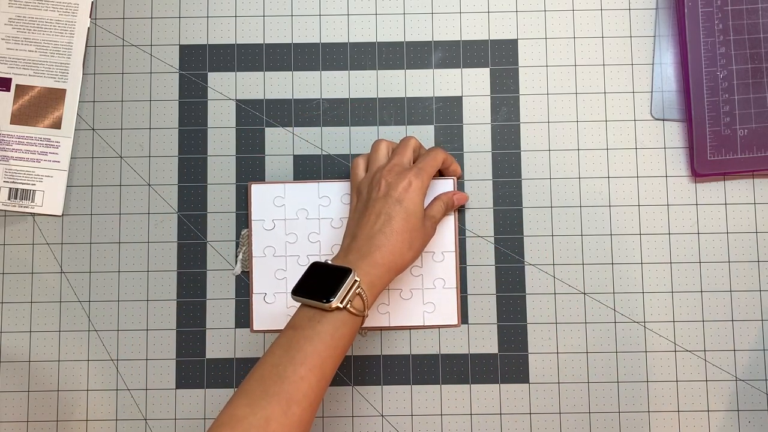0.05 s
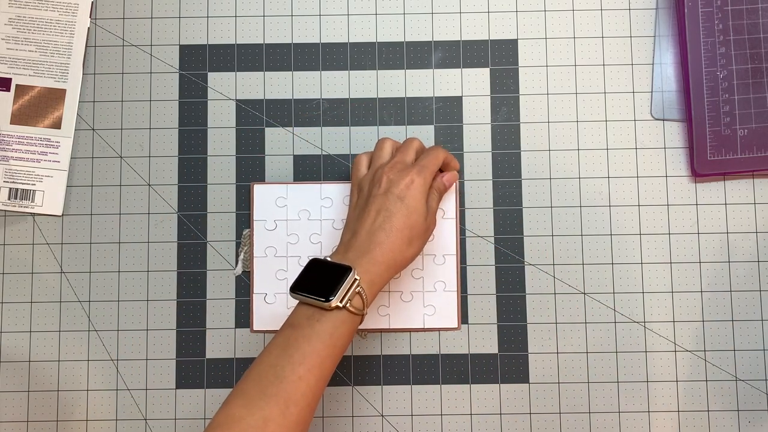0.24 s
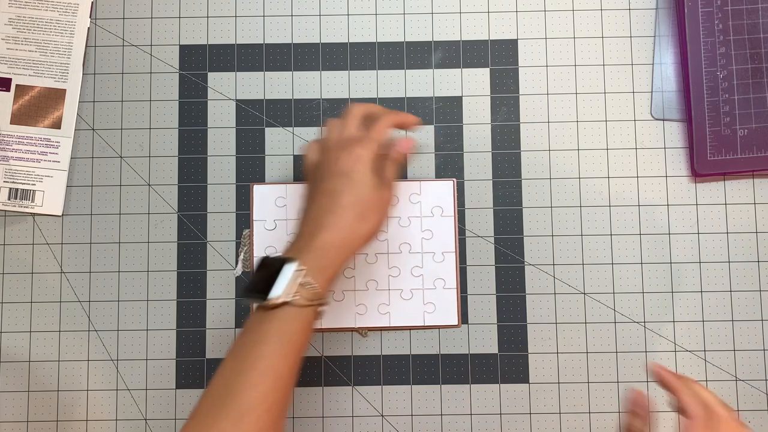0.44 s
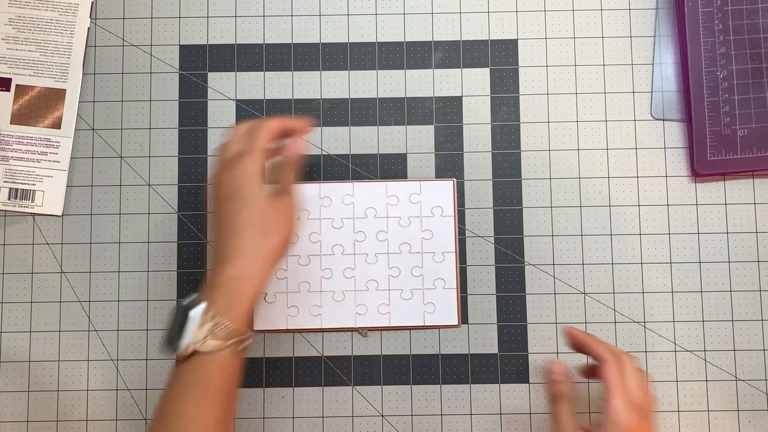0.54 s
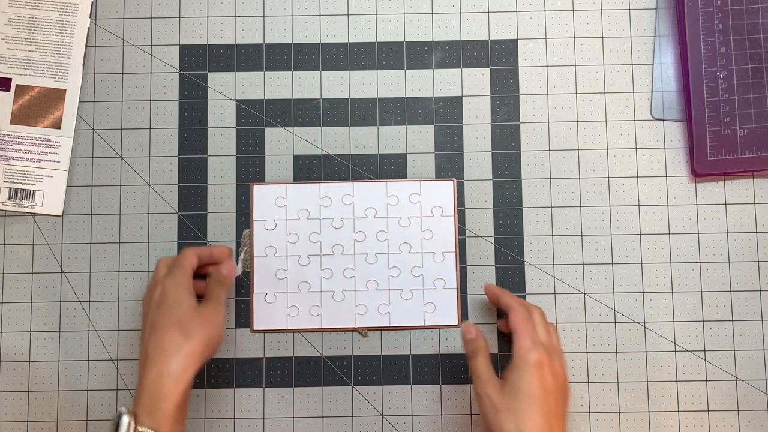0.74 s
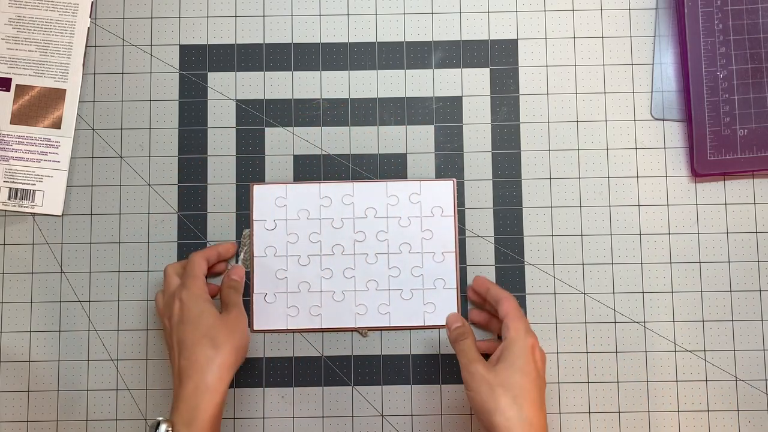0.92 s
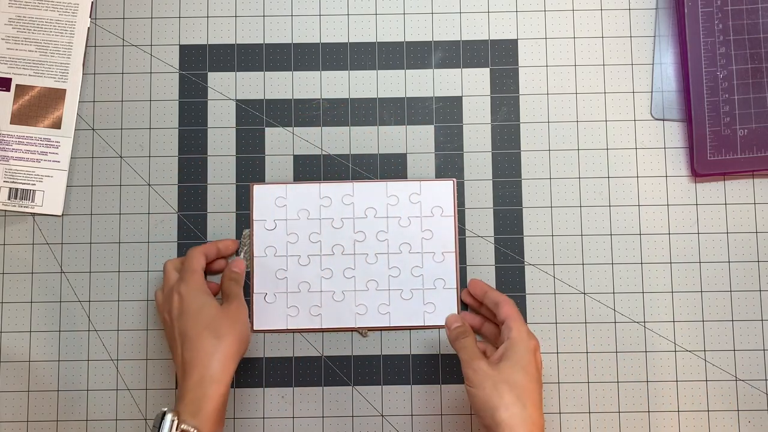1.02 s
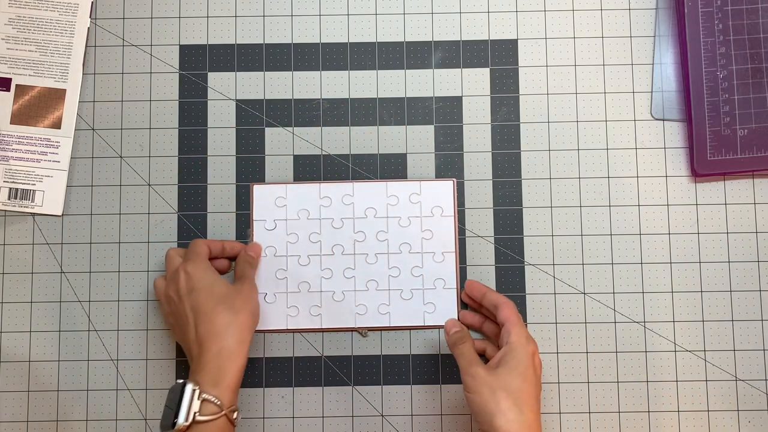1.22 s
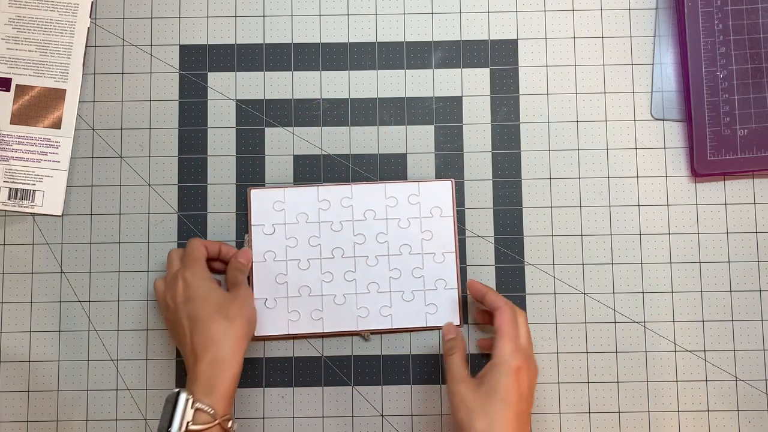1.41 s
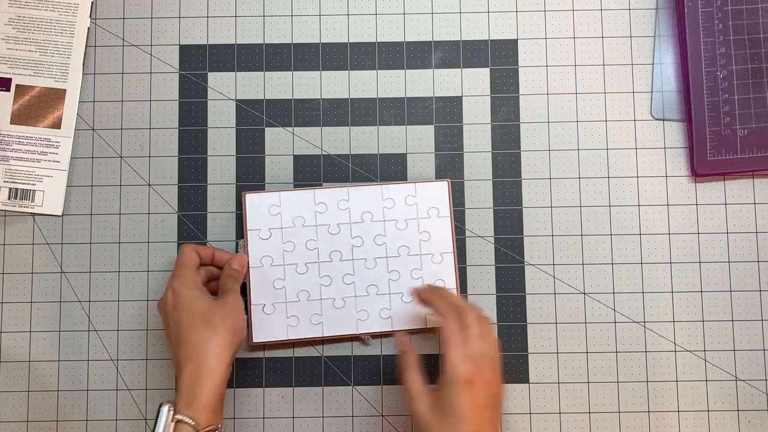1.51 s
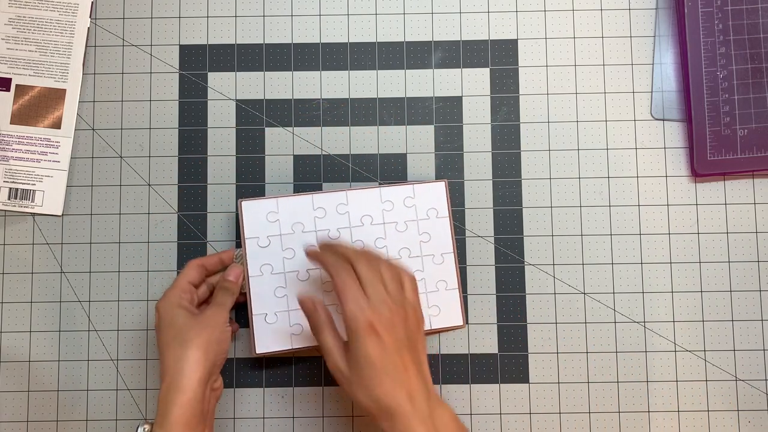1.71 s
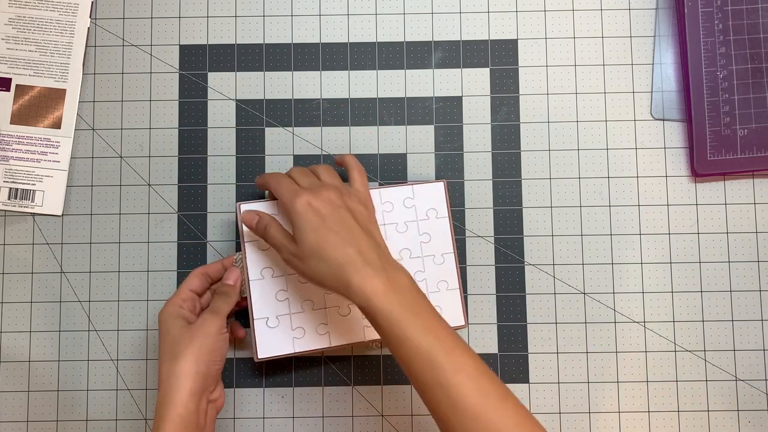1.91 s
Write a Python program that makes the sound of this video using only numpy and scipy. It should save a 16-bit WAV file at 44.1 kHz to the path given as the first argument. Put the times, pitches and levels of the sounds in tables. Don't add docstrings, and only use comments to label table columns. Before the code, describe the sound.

A stiff card snaps loudly onto a shallow box on a cutting mat, bounces at once with a low table thump, then quiet taps, ticks and scuffs follow, close microphone in a small room.

```python
import sys
import numpy as np
from scipy import signal
from scipy.io import wavfile
from scipy.ndimage import uniform_filter1d

SR = 44100
rng = np.random.default_rng(int(sys.argv[2]) if len(sys.argv) > 2 else 0)


def wrap_up_sound(samples):
    columns = np.atleast_2d(samples).T
    tamed = np.clip(columns, -1, 1)
    steps = np.round(tamed * 32767).astype(np.int16)
    wavfile.write(sys.argv[1], SR, steps)


def field_ratio(decibels):
    return 10 ** (np.asarray(decibels, dtype=float) / 20)


N = 85995

# frequency in Hz, level in dB.
SCRATCH_SPECTRUM = [(2000, -0.5), (2800, 11), (3600, 5), (5500, 0.5), (8000, -5.5), (12000, -8),
                    (17000, -32.5)]


def evened(x):
    return x / np.sqrt(np.mean(x ** 2) + 1e-20)


def read(points, hz):
    f, value = np.transpose(points)
    return np.interp(np.log(hz + 1), np.log(f + 1), value)


def along(curve):
    return field_ratio(np.interp(np.arange(N) / SR, *np.transpose(curve)))


def add(mix, s, sound):
    part = mix[round(s * SR):][:len(sound)]
    part += sound[:len(part)]


def ring(modes, weight_db):
    t = np.arange(12000)[:, None] / SR
    hz, db, t60 = np.transpose(modes)
    envelope = field_ratio(db + weight_db - 60 * t / t60)
    x = (envelope * np.sin(2 * np.pi * hz * t)).sum(1)
    return x / np.linalg.norm(x)


def causal(points):
    spectrum_db = read([(0.76, -37)] + points, np.fft.rfftfreq(1024, 1 / SR))
    half = np.log(field_ratio(spectrum_db))
    log_gain = np.r_[half, half[-2:0:-1]]
    phase = -signal.hilbert(log_gain).imag
    x = np.fft.ifft(np.exp(log_gain + 1j * phase)).real[:512]
    return x / np.linalg.norm(x)


def clicks(shape, share, spread_db):
    size = field_ratio(spread_db * np.minimum(rng.exponential(1, shape), 4))
    sign = rng.choice([-1., 1.], shape)
    return size * sign * (rng.random(shape) < share)


def floor():
    # frequency in Hz, level in dB per Hz.
    floor_spectrum = [(12, -21), (20, 7.5), (61, -5.5), (607, -24), (698, -27.5), (1330, -29.5),
                      (1760, -31), (3160, -38.5), (16000, -44.5)]
    frames, hz = N // 512 + 5, np.fft.rfftfreq(2048, 1 / SR)
    a, b, patches = rng.standard_normal((frames, 1025, 3)).T
    patches = uniform_filter1d(patches, size=24, axis=0)
    patches = evened(uniform_filter1d(patches, size=6, axis=1))
    z = (a + 1j * b) * field_ratio(read(floor_spectrum, hz)[:, None] + 1.0 * patches)
    noise = signal.istft(z, nperseg=2048, noverlap=1536)[1][:N]
    return field_ratio(-45.5) * evened(noise)


def room(x):
    # frequency in Hz, t60 in seconds.
    room_decay = [(100, 0.69), (500, 0.18), (2000, 0.11), (8000, 0.15), (16000, 0.1)]
    echoes, starts = np.zeros(SR // 2), np.arange(120, SR // 2 - 20, 20)
    echoes[starts + rng.integers(0, 20, len(starts))] = rng.choice([-1., 1.], len(starts))
    hz, t, z = signal.stft(echoes, SR, nperseg=256)
    decay = field_ratio(-60 * t / read(room_decay, hz)[:, None])
    tail = signal.istft(z * decay, SR, nperseg=256)[1]
    return signal.fftconvolve(x, tail / np.linalg.norm(tail))[:N]


def table():
    # start in seconds, level in dB, hardness in Hz.
    blows = [(0.241, -21.5, 300), (0.269, -23.5, 202), (.292, -23.5, 149), (0.318, -30.5, 200),
             (0.353, -31, 106), (0.675, -36.5, 300), (0.711, -38, 100), (0.752, -40.5, 405),
             (0.787, -38.5, 151), (0.863, -44, 195), (.923, -40.5, 350), (0.9457, -41, 300),
             (1.325, -42.5, 152), (1.447, -39.5, 199), (1.801, -39, 213), (.385, -34.5, 70)]
    # mode frequency in Hz, level in dB, t60 in seconds.
    table_modes = [(45.2, -10, 0.72), (54, 0, 0.087), (64.3, -2.5, 0.12), (86, -4, 0.091),
                   (137.4, -2, 0.12), (186, -9.5, 0.46), (225.5, 0, 0.036), (300, -1, 0.092)]
    out, hz = np.zeros(N), np.transpose(table_modes)[0]
    for s, db, hard_hz in blows:
        softness_db = -10 * np.log10(1 + (hz / hard_hz) ** 4)
        add(out, s, field_ratio(db + 27) * ring(table_modes, softness_db))
    return out


def glide():
    # time in seconds, speed in dB.
    glide_speed = [(0, -110), (.3, -68), (.45, -71), (.52, -73.5), (.58, -67.5), (.7, -77.5), (1.1, -74.5),
                   (1.45, -72.5), (1.51, -67.5), (1.6, -68), (1.67, -65.5), (1.73, -62), (1.8, -58),
                   (1.85, -61.5), (1.88, -74), (1.95, -70)]
    grit_hz, width_hz, sag_hz = 3500, 740, 450
    load = along(glide_speed)
    pitch_hz = grit_hz - sag_hz * load / load.max()
    turn = np.exp(2j * np.pi * np.cumsum(pitch_hz) / SR)
    band = signal.butter(2, width_hz / 2, fs=SR, output="sos")
    flicker = field_ratio(1.5 * evened(uniform_filter1d(rng.standard_normal(N), size=600)))
    grit = clicks(N, 0.26, 1.5) * flicker
    resonance = evened((turn * signal.sosfilt(band, grit / turn)).real)
    hiss = field_ratio(-1.5) * evened(np.convolve(grit, causal(SCRATCH_SPECTRUM))[:N])
    return (resonance + hiss) * load


def card(colour_hz, crack_db, width_oct, crack):
    # mode frequency in Hz, level in dB, t60 in seconds.
    card_modes = [(362, 9, 0.039), (446, -6, 0.049), (592, 5.5, 0.033), (822, 2.5, 0.021),
                  (1270, -1.5, 0.15), (1467, -3, 0.057), (1646, 1.5, 0.031), (1883, 5, 0.017),
                  (2124, 4, 0.023), (2264, 0, 0.031), (2500, 6, 0.021), (2770, 6.5, 0.018),
                  (3150, 5.5, 0.0093), (3500, -1, 0.0082)]
    hand_t60, bend = 0.055, 0.02
    hz, db, t60 = np.transpose(card_modes)
    bent_hz = hz * (1 + bend * rng.standard_normal(len(hz)))
    modes = np.transpose([bent_hz, db, np.minimum(t60, hand_t60)])
    octaves = np.log2(hz / colour_hz) / width_oct
    fibres = np.pad(causal(crack), (0, 11488)) * field_ratio(crack_db + 12.0)
    return 4.0 * ring(modes, -6.0 * octaves ** 2) + fibres


def contacts(rows, width_oct, crack, first, soft=False):
    out, t = np.zeros(N), np.arange(6000) / SR
    flurries = clicks((len(rows), 6000), .3, 2.2)
    for (s, db, hz, crack_db, length), flurry in zip(rows, flurries):
        push = (flurry + first * (t == 0)) * np.exp(-t / length)
        if soft:
            push = push * t
        push = push / np.linalg.norm(push)
        answer = card(hz, crack_db, width_oct, crack)
        add(out, s, field_ratio(db) * signal.fftconvolve(push, answer))
    return out


def rub():
    # time in seconds, pressure in dB.
    rub_pressure = [(0, -50), (.07, -64), (.13, -72.5), (.2, -54.5), (.235, -60), (.36, -58), (.45, -77),
                    (.66, -78), (.72, -62), (.8, -61.5), (.9, -57.5), (1, -68), (1.35, -75), (1.39, -69),
                    (1.45, -67), (1.6, -86), (1.8, -57), (1.95, -82)]
    # lid mode frequency in Hz, level in dB, t60 in seconds.
    lid_modes = [(163, -1, 0.094), (325, -1.5, 0.05), (530, -11, 0.056), (780, -8, 0.042)]
    slips_per_s, spread_db, lift_s = 5000, 3.0, 0.28
    slips = evened(clicks(N, slips_per_s / SR, spread_db)) * along(rub_pressure)
    lid = signal.fftconvolve(slips[:round(lift_s * SR)], ring(lid_modes, 0) * field_ratio(2))
    answer = card(950, -9, 1.0, SCRATCH_SPECTRUM) / 3.24
    out = signal.fftconvolve(slips, answer)[:N]
    add(out, 0, lid)
    return out


def ticks():
    # start in seconds, level in dB, pitch in Hz, t60 in seconds.
    tick_rows = [(0.0478, -52, 1278, 0.063), (0.2193, -52.5, 1308, 0.053), (.2416, -28, 2287, 0.041),
                 (0.2431, -27, 1456, 0.11), (.2491, -33, 597, 0.11), (0.3143, -32.5, 1284, 0.06),
                 (.5581, -56.2, 3220, .012), (.6738, -41.5, 1346, 0.022), (.6743, -49.5, 2105, 0.029),
                 (0.6925, -43, 1350, 0.027), (0.7523, -53.5, 1277, 0.07), (0.7535, -51.5, 329, 0.13),
                 (.7532, -53, 579, 0.21), (.7533, -55, 807, 0.095), (.7534, -52.5, 440, 0.092),
                 (.8641, -54, 476, 0.061), (0.9153, -46, 1280, 0.014), (0.9245, -49, 204, .09),
                 (1.0608, -54, 2761, .006), (1.1643, -62, 1336, 0.075), (1.3011, -54.5, 1327, 0.063),
                 (1.4203, -49.5, 1290, 0.033), (1.4385, -58, 1260, 0.088), (1.4616, -39, 3410, 0.008),
                 (1.5231, -44, 1410, .018), (1.5577, -49, 1470, 0.017), (1.6571, -47.5, 2023, 0.029),
                 (1.6961, -55, 3560, .013), (1.8033, -52.5, 3040, 0.024), (1.9441, -49.5, 3140, 0.01),
                 (.2425, -27, 1900, .03), (.2465, -25, 2084, 0.022), (.2775, -31, 2220, 0.013),
                 (1.1652, -54, 1950, 0.026), (1.5572, -50, 3770, .008), (1.5633, -50, 3830, .025)]
    out, t = np.zeros(N), np.arange(3000) / SR
    for s, db, hz, t60 in tick_rows:
        envelope = field_ratio(db + 9 - 60 * t / t60) * (1 - np.exp(-t / 0.00019))
        add(out, s, envelope * np.sin(2 * np.pi * hz * t))
    return out


def scuffs():
    # start in seconds, level in dB, colour in Hz, crack in dB against the ring, length in seconds.
    scuff_rows = [(.256, -14, 1450, -2, 0.018), (.32, -40, 1510, 6.5, 0.0098),
                  (.33, -25.5, 560, -45, 0.0081), (.86, -63, 1400, -9, 0.025),
                  (1.183, -38.5, 1930, 3.5, 0.0082), (1.192, -37.5, 2600, 2.5, 0.0046),
                  (1.285, -37.5, 2300, -6, 0.0097), (1.361, -35.5, 1690, -18, 0.016),
                  (1.382, -37, 2390, -12, 0.008), (1.394, -41, 2500, -6, 0.0057),
                  (1.408, -34, 1770, -8.5, 0.0079), (1.411, -34.5, 650, -25, 0.013),
                  (1.435, -40.5, 1270, -30, 0.0074)]
    return contacts(scuff_rows, 0.66, SCRATCH_SPECTRUM, 0, soft=True)


def taps():
    # start in seconds, level in dB, colour in Hz, crack in dB against the ring, length in seconds.
    tap_rows = [(.6925, -34, 1730, -10, 0.004), (.698, -37, 2160, -11, 0.0065),
                (.7485, -31, 1300, -5.5, 0.017), (.7525, -37, 450, -32, 0.016),
                (.7575, -44, 700, -24, .002), (.7615, -45, 500, -27, 0.0017),
                (.7685, -54, 600, -22, 0.0024), (.9135, -37, 1880, -3.5, 0.006),
                (.9185, -29.5, 550, -36, 0.0057), (.923, -45.5, 450, -25, 0.0016),
                (.9275, -50, 1100, -15, .003), (1.241, -45.5, 1440, -22, 0.0045),
                (1.3215, -40, 2500, 2.5, 0.0059), (1.523, -37.5, 1500, -19, 0.001),
                (1.5295, -40, 1500, -7, 0.0029), (1.5325, -42, 2200, -7, 0.00092),
                (1.5385, -34.5, 1440, -21, 0.0011), (1.545, -40, 2400, -7, .004),
                (1.5625, -38, 2300, 5.5, 0.00052), (1.564, -41, 3500, 6, 0.0064),
                (1.5712, -42, 2770, -4, 0.0017), (1.575, -49, 2500, -2, .008),
                (1.6568, -39, 2160, 4, 0.011)]
    return contacts(tap_rows, 0.76, SCRATCH_SPECTRUM, 1.0)


def snap():
    # start in seconds, level in dB, colour in Hz, crack in dB against the ring, length in seconds.
    snap_rows = [(.2398, -14, 1830, -3, 0.00061), (.2408, -6, 2150, -4, 0.0014),
                 (.2445, -5, 1650, -13, 0.0055), (.2525, -9.5, 650, -14, 0.0038),
                 (.264, -25, 1500, -12, 0.0024), (.2715, -24, 2300, -4, 0.0018),
                 (.2775, -22, 2300, -11, 0.0024), (.2832, -13, 1660, -7.5, 0.0014),
                 (.2925, -14, 2280, -20, 0.0019), (.3245, -26, 1700, -25, .003),
                 (.3435, -30.5, 1520, -24, 0.0029), (.2875, -9.5, 1890, -10, 0.0034),
                 (.2955, -11, 726, -26, 0.0042), (.3135, -16.5, 1260, -13, 0.0061),
                 (.337, -27, 1320, -31, 0.0022), (.6738, -32.5, 1940, -15, 0.0029),
                 (.6775, -31, 2200, -17, 0.009), (1.164, -41.5, 2010, 0, 0.01),
                 (1.1715, -42, 1860, 5, 0.003), (1.5573, -37.5, 1660, 4, 0.0047)]
    # frequency in Hz, level in dB.
    fibre_spectrum = [(2500, -35), (4400, -7), (5600, 6.5), (6800, 18), (8000, 14), (11500, 7.5),
                      (15000, 5.5), (17000, -36)]
    return contacts(snap_rows, 0.64, fibre_spectrum, 1.54)


def scene():
    near = snap() + taps() + ticks() + scuffs() + rub() + glide()
    return (near + field_ratio(-11.5) * room(near) + table() + floor())[None]


def low_pass(x):
    return signal.sosfilt(signal.butter(12, 16850, fs=SR, output="sos"), x)


def record(dry):
    limit, edge_hz = 0.62, 16100
    x = signal.sosfilt(signal.butter(2, 14, "high", fs=SR, output="sos"), dry)
    x = limit * np.tanh(x / limit)
    lowpass = signal.firwin(255, edge_hz, window=("kaiser", 4), fs=SR)
    x = signal.oaconvolve(x, lowpass[None], "same")
    return low_pass(x)


dry = scene()
out = record(dry)
wrap_up_sound(out)
```